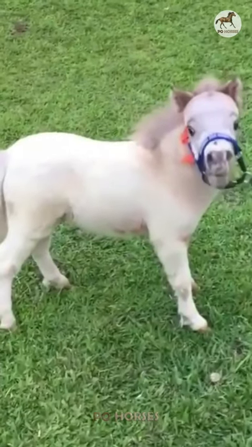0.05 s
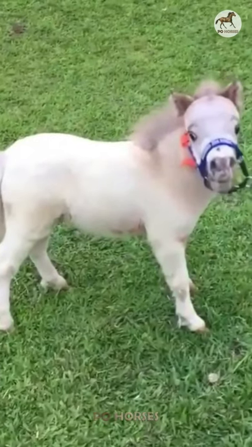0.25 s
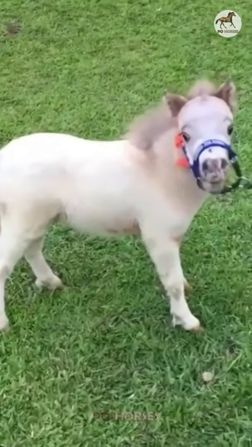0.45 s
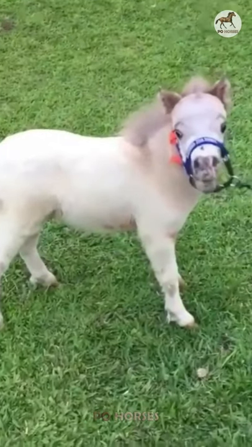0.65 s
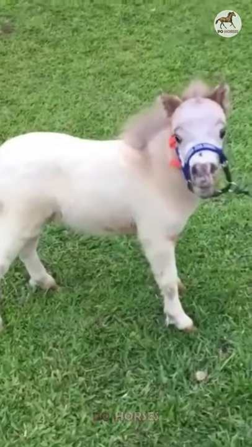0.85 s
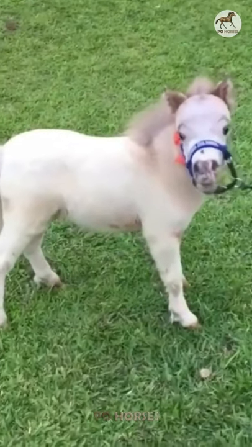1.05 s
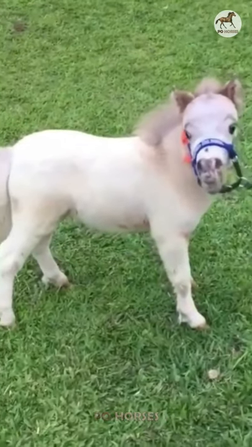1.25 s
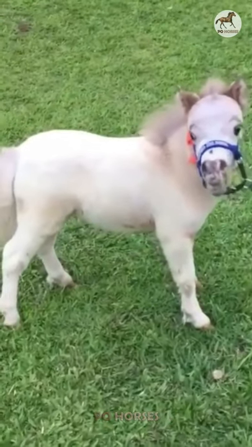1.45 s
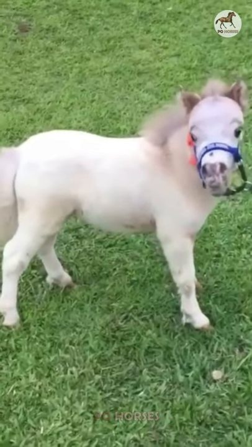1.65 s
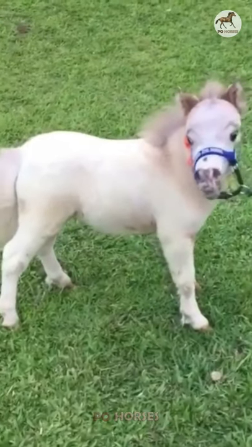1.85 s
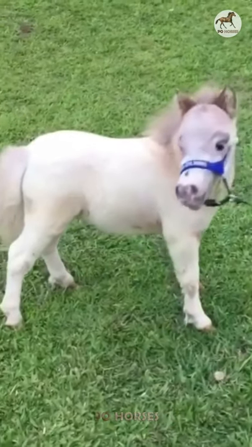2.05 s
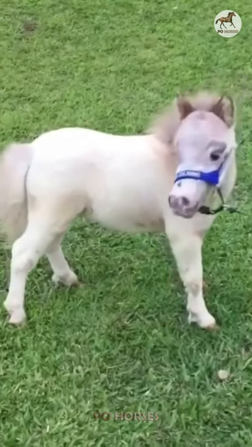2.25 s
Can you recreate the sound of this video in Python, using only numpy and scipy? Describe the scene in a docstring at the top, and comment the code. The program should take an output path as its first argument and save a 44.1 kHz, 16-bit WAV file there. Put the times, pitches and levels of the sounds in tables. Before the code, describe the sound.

A young miniature horse whinnies close to the microphone on an open lawn. After a soft breath in, a shrill squeak turns into a raspy, wavering call that ends in a short grunt, over a faint low rumble.

```python
"""A young miniature horse whinnies on an open lawn, close by, over a faint low rumble and hum.
It draws air through its nostrils, then a shrill, whistle-like voice starts with a clean squeak.
The voice turns raspy and wavers ever more deeply, while its ringing colour slowly shifts.
In the late dips a second, lower voice sounds, made of uneven beats of the vocal folds.
That voice ends the call as a slowing grunt while the rest of the breath goes out."""
import sys
import numpy as np
from scipy import signal
from scipy.fft import rfft, irfft, next_fast_len
from scipy.io import wavfile
from scipy.ndimage import uniform_filter1d

SR = 44100
rng = np.random.default_rng(int(sys.argv[2]) if len(sys.argv) > 2 else 0)


def materialize(psi):
    """Save the field psi as 16-bit PCM at rate SR to the path in sys.argv[1].

    A 1-D psi becomes a single channel; in a 2-D psi each row is a channel.
    """
    bounded = np.clip(np.atleast_2d(psi).T, -1, 1)
    quanta = np.round(bounded * 32767).astype(np.int16)
    wavfile.write(sys.argv[1], SR, quanta)


N = 101429
TIME = np.arange(N) / SR
CUTOFF_HZ = 15650
JITTER_HZ, SHIMMER_HZ, SHIMMER_DB = 300, 60, 3.2   # speed of pitch shake; speed and depth of level shake


def from_db(db):
    """Decibels to gain."""
    return 10 ** (np.asarray(db) / 20)


def unit_power(x):
    """Scale to an RMS of 1."""
    return x / np.sqrt(np.mean(x ** 2) + 1e-20)


def envelope(rows, column=1):
    """One column of a breakpoint table at every sample."""
    rows = np.array(rows)
    return np.interp(TIME, np.sort(rows[:, 0]), rows[:, column])


def eq_gain(curve, hz):
    """Gain of an EQ curve at given frequencies."""
    points_hz, db = np.transpose(curve)
    return from_db(np.interp(np.log(np.maximum(hz, 1)), np.log(np.sort(points_hz)), db))


def drift(hz):
    """Smooth random modulation at unit power; hz sets its speed."""
    pole = np.exp(-2 * np.pi * hz / SR)
    return unit_power(signal.lfilter([1], [1, -2 * pole, pole * pole], rng.standard_normal(2 * N))[N:])


def coloured(x, curve, resonances=()):
    """Shape a sound by a broad EQ curve and narrow bells, at unit power."""
    size = next_fast_len(N + SR // 10, True)
    hz = np.arange(size // 2 + 1) * SR / size
    bells_db = sum(db * np.exp(-.5 * np.minimum(np.abs(hz - centre) / width, 10) ** 2)
                   for centre, width, db in resonances)
    broad = eq_gain(curve, hz) if curve else 1
    return unit_power(irfft(rfft(x, size) * broad * from_db(bells_db), size)[:N])


def levelled(x, window_s=0.029):
    """Even out slow changes of level."""
    return x / np.sqrt(np.abs(uniform_filter1d(x ** 2, int(window_s * SR))) + 1e-6)


def gate(start_s, end_s, attack_s, release_s):
    """Linear attack, hold and release."""
    return np.clip((TIME - start_s) / attack_s, 0, 1) * np.clip((end_s - TIME) / release_s, 0, 1)


# Bass-heavy colour of the outdoor bed: freq_hz, gain_db
RUMBLE_EQ = [(25, -37.5), (65, 0), (110, 1), (200, -16), (550, -19.5), (2500, -38.5), (15000, -93)]


def background(hum_hz=113.5, hum_db=-45, rumble_db=-43.5):
    """Far outdoor rumble with a wavering hum."""
    phase = 2 * np.pi * np.cumsum(hum_hz * (1 + 0.0317 * drift(3.1))) / SR
    hum = from_db(hum_db + 2.5 * np.clip(drift(4), -2, 2)) * np.sin(phase)
    return hum + from_db(rumble_db) * coloured(rng.standard_normal(N), RUMBLE_EQ)


# Air through the nostrils, in and then out: time_s, level_db
BREATH = [(0, -67), (.09, -46.5), (.13, -36), (.165, -34.5), (.188, -53), (1.95, -113), (1.97, -35.5),
          (2.07, -31.5), (2.11, -45.5), (2.14, -58.5)]
# Colour of that breath: freq_hz, gain_db
BREATH_EQ = [(150, 2.5), (380, 2), (860, -12.5), (1700, -14.5), (4400, -6.5), (12000, -24.5), (13500, -51)]


def nostrils():
    """The horse draws air before the call and lets the rest out at its end."""
    return from_db(envelope(BREATH)) * call_colour(rng.standard_normal(N), BREATH_EQ)


def morph(from_s=1, to_s=1.63):
    """Timbre of the call, from 0 (early) to 1 (late)."""
    return np.clip((TIME - from_s) / (to_s - from_s), 0, 1)


# Narrow peaks and notches that colour the call, with ringing treble:
# centre_hz, width_hz, early_gain_db, late_gain_db
PEAKS_AND_NOTCHES = [(1150, 95, 12, 8.5), (2940, 190, 0, 5), (3377, 53, 5.5, 6), (3660, 77, -9, -14),
                     (4520, 57, 4.5, 10), (6210, 50, 3, 11.5), (7286, 60, 6.5, 0), (7580, 142, -12, -1.5),
                     (8600, 84, 4, 6.5), (8990, 54, 8.5, 5), (9190, 130, -5, -18.5), (9770, 100, 6, 4),
                     (10240, 98, -12, -0.5), (12920, 96.3, 16, 5.5)]


def call_colour(x, curve):
    """Apply a broad EQ and crossfade from the early peaks and notches to the late ones."""
    hz, width, early_db, late_db = np.transpose(PEAKS_AND_NOTCHES)
    early = coloured(x, curve, zip(hz, width, early_db))
    late = coloured(x, curve, zip(hz, width, late_db))
    return (1 - morph()) * early + morph() * late


# The opening squeak (clarity is tone over rasp): time_s, pitch_hz, level_db, clarity_db, fundamental_db
SQUEAK = [(.23, 1463, -15.5, 9, -41), (.246, 1503, -12, 33, -44.5), (.266, 1553, -18, 6, -39),
          (.276, 1623, -26.5, 1, -45), (.305, 1654, -23.5, -1.5, -39)]
# Wavers of the high voice: start_s, rise_s, trough_hz, crest_hz, level_db, clarity_db, fundamental_db
WAVERS = [(.333, 0.027, 1649, 1793, -21.5, 5, -34.5), (.417, 0.029, 1660, 1811, -20, 5.5, -32),
          (.518, 0.031, 1719, 1840, -16.5, -0.5, -29.5), (.620, 0.047, 1706, 1870, -18, -5.5, -30),
          (0.736, 0.023, 1705, 1875, -16.5, -2.5, -32), (.848, 0.038, 1687, 1881, -14, 0.5, -30.5),
          (.962, 0.063, 1617, 1799, -19.5, 1.5, -30.5), (1.085, 0.048, 1368, 1773, -19, 0.5, -29.5),
          (1.195, 0.049, 1289, 1776, -18.2, 2.5, -29.5), (1.308, .055, 1124, 1670, -16.5, -3, -29.5),
          (1.408, .063, 1204, 1717, -19, 0, -29.5), (1.524, 0.056, 1126, 1674, -16.7, 0, -31),
          (1.642, .064, 1127, 1579, -15.5, 3, -31), (1.751, .067, 1150, 1625, -17, 2.5, -33),
          (1.869, .049, 1085, 1518, -16.5, 1.5, -32)]
# Offsets through one early waver, in even steps from trough to trough with the crest in row four:
# level_db, clarity_db, fundamental_db, treble_db
EARLY_WAVER = [(-2, 5.5, -4, 4), (-6.5, -5, -3, -1.5), (-8, 0.5, -10.5, -0.5), (-5.5, -2, -7, -8.5),
               (-5, 6, -5, -1), (-5.5, 2, 3, 0)]
# The same through one late waver: level_db, clarity_db, fundamental_db, treble_db
LATE_WAVER = [(-0.96, -8.5, -6.7, -3.7), (-2.5, -6.5, -6.5, 3), (-0.94, -3.5, -4, 2),
              (-1.16, 2.5, -0.1, 7.5), (-0.87, 1, 2, 1.5), (-1.4, -0.5, -4.5, 5.5)]
# The closing downward slide: time_s, pitch_hz, level_db, clarity_db, fundamental_db
SLIDE = [(1.953, 1260, -19, -8, -27), (1.966, 1000, -33, -5, -24), (1.995, 500, -50, 2, -30)]


def whinny_contour(duck_s=0.014):
    """Pitch, level, clarity, fundamental and treble of the high voice through squeak, wavers and slide."""
    start, rise, trough_hz, crest_hz, *crest_levels = np.transpose(WAVERS)
    turns = np.append(np.column_stack([start, start + rise]), SLIDE[0][0])
    cycle = np.interp(TIME, turns, np.arange(len(turns)) / 2)   # whole at troughs, half at crests
    waver = np.minimum(cycle.astype(int), len(start) - 1)
    late = np.interp(TIME, [.88, 1.1], [0, 1])
    foot_hz = np.append(trough_hz, SLIDE[0][1])[np.round(cycle).astype(int)]
    fall = np.abs(2 * (cycle - waver) - 1) ** (1.2 + 1.1 * late)   # pointed wavers become round arches
    pitch = crest_hz[waver] + (foot_hz - crest_hz[waver]) * fall
    steps = np.arange(len(EARLY_WAVER)) / len(EARLY_WAVER)
    *offsets, treble = [
        (1 - late) * np.interp(cycle, steps, first, period=1)
        + late * np.interp(cycle, steps, last, period=1)
        for first, last in zip(np.transpose(EARLY_WAVER), np.transpose(LATE_WAVER))]
    level, clarity, fundamental = [np.interp(TIME, start + rise, db) + offset
                                   for db, offset in zip(crest_levels, offsets)]
    # The voice fades into each dip and returns abruptly.
    duck_db = sum(db * np.exp(-np.abs((TIME - s) / duck_s) ** np.where(TIME < s, 2, 10))
                  for s, *_, db in DIPS)
    opening = np.interp(TIME, [SQUEAK[-1][0], start[0]], [1, 0])
    controls = []
    for column, wavering in enumerate((pitch, level - duck_db, clarity, fundamental), 1):
        call = opening * envelope(SQUEAK, column) + (1 - opening) * wavering
        controls.append(np.where(TIME > SLIDE[0][0], envelope(SLIDE, column), call))
    controls.append(treble * (1 - opening))
    return [uniform_filter1d(control, size=220) for control in controls]


# Brief accents of the high voice: centre_s, half_length_s, boost_db, clarity_change_db
SURGES = [(0.845, .012, 0, -4), (1.058, 0.0096, 5, -1), (1.499, 0.0027, 5.5, -12.5),
          (1.692, 0.0093, 2, 8.5)]


def high_voice(hoarse_below_hz=1600, treble_hz=6900):
    """A shrill oscillator that shifts between clear tone and rasp and goes hoarse as it sinks."""
    pitch, level_db, clarity_db, fundamental_db, treble_db = whinny_contour()
    for centre_s, half_s, boost_db, change_db in SURGES:
        swell = np.exp(-((TIME - centre_s) / half_s) ** 2)
        level_db += boost_db * swell
        clarity_db += change_db * swell
    rough = 1 / np.sqrt(1 + from_db(clarity_db) ** 2)
    hoarse = rough ** 2 * np.clip(2 * (1 - pitch / hoarse_below_hz), 0, .5)
    jitter = .002 + .014 * rough ** 2 + .1 * hoarse
    phase = 2 * np.pi * np.cumsum(pitch * (1 + jitter * drift(JITTER_HZ))) / SR
    tone = np.sqrt(1 - rough ** 2) * overtones(pitch, phase, rough)
    upper = tone + rough * rasp(phase, rough) + side_tones(phase)
    treble = signal.sosfiltfilt(signal.butter(2, treble_hz, "high", fs=SR, output="sos"), upper)
    upper += (from_db(treble_db) - 1) * treble
    flutter = (1 - hoarse) + hoarse * drift(JITTER_HZ)
    shimmer_db = SHIMMER_DB * rough ** 2 * drift(SHIMMER_HZ)
    fundamental = from_db(fundamental_db + shimmer_db) * flutter * np.sqrt(2) * np.sin(phase)
    return (from_db(level_db) * upper + fundamental) * gate(0.2227, 2.01, 0.0041, 0.014)


# Piercing colour of the overtones: freq_hz, gain_db
OVERTONE_EQ = [(2600, -8), (3400, 0.5), (4550, 6.5), (5400, 11), (6200, 9), (7000, -12), (8900, -1.5),
               (10500, -57)]


def overtones(pitch, phase, rough):
    """Harmonics 2 to 6; roughness shakes them and brings in weak half-order tones between them."""
    tone = 0
    for order in np.arange(4, 13) / 2:
        if order % 1 == 0:
            strength, slip_rad = 1, (.85 - .5 * morph()) * rough
        else:
            strength, slip_rad = from_db(-10 + 2 * SHIMMER_DB * drift(32)) * rough, 0.77
        shimmer = from_db(SHIMMER_DB * rough * drift(SHIMMER_HZ))
        partial = np.sin(order * phase + slip_rad * drift(JITTER_HZ))
        tone += strength * shimmer * eq_gain(OVERTONE_EQ, order * pitch) * partial
    return levelled(call_colour(tone, None), window_s=0.091)


# Thin, high inharmonic tones that sound along with the squeak: pitch_ratio, gain_db
SIDE_TONES = [(4.7, -10), (5.68, -9), (6.65, -10)]


def side_tones(phase, slip_rad=.35):
    """Thin, high tones that follow the squeak's pitch and fade as it goes on."""
    fade = np.interp(TIME, [SQUEAK[0][0], SQUEAK[-2][0]], [1, 0])
    return fade * sum(from_db(db) * np.sin(ratio * phase + slip_rad * drift(JITTER_HZ))
                      for ratio, db in SIDE_TONES)


# Bright hiss of the rasp, above about 2.5 kHz: freq_hz, gain_db
RASP_HISS_EQ = [(2000, -39), (2550, -14.5), (3200, -8.5), (4400, 1.5), (6200, 2.5), (8700, -1.5),
                (10500, -7.5), (11900, -3), (12250, -27.5), (13100, -18), (13400, -37.5), (15500, -50.5)]
# Darker body of the rasp, around 1-2 kHz: freq_hz, gain_db
RASP_BODY_EQ = [(200, -25), (1150, -3), (2100, 0), (2700, -13), (3500, -26)]


def rasp(phase, rough, pulsing=0.16):
    """Air pulsing at the voice's pitch: a patchy hiss, with a lower body that grows with roughness."""
    air = rng.standard_normal(N) * (1 + pulsing * np.cos(phase))
    hiss = levelled(call_colour(patchy(air), RASP_HISS_EQ))
    body = from_db(-15) * rough ** 2 * call_colour(air, RASP_BODY_EQ)
    return hiss + body


def patchy(x, depth_db=3.4, speed_hz=32, spacing_hz=430):
    """Each narrow band of the spectrum swells and fades on its own."""
    size = next_fast_len(N, True)
    spectrum = rfft(x, size)
    position = np.arange(size // 2 + 1) * SR / size / spacing_hz
    bands = (irfft(spectrum * np.clip(1 - np.abs(position - k), 0, 1), size)[:N]
             for k in range(int(CUTOFF_HZ / spacing_hz) + 1))
    return sum(band * from_db(depth_db * np.clip(drift(speed_hz), -2, 2)) for band in bands)


def fold_pulses(pitch, air_db, jitter=.035):
    """Uneven beats of the vocal folds, each with a puff of air."""
    cycles = np.cumsum(pitch * (1 + jitter * drift(JITTER_HZ))) / SR
    beats = np.diff(np.floor(cycles), prepend=0) / np.sqrt(pitch)
    beats *= from_db(SHIMMER_DB * drift(JITTER_HZ))
    puffs = rng.standard_normal(N) * np.exp(-4 * (cycles % 1))
    return unit_power(beats) + from_db(air_db) * unit_power(puffs)


# Low notes in the dips: centre_s, half_length_s, pitch_hz, level_db, high_voice_duck_db
DIPS = [(1.308, 0.026, 540.5, -28, 9), (1.409, 0.024, 569.6, -25, -1), (1.524, 0.024, 532.2, -26, 7),
        (1.64, .024, 400, -24, 11), (1.746, 0.025, 563, -25, 6.5), (1.869, 0.027, 380.6, -22, 10.5)]
# Mid-heavy colour of those notes: freq_hz, gain_db
LOW_VOICE_EQ = [(200, -39), (370, 0.5), (560, -2.5), (800, -11.5), (1130, 3), (1700, -2), (4500, -32.5)]


def low_voice(bend=0.27, fall=0.2):
    """The low voice swells in each late dip of the high one; its pitch falls, then curls up a little."""
    pitch, level = np.ones(N) * DIPS[0][2], np.zeros(N)
    for centre_s, half_s, hz, db, _ in DIPS:
        position = (TIME - centre_s) / half_s
        inside = np.abs(position) < 1
        pitch[inside] = hz * (1 + bend * position[inside] ** 2 - fall * position[inside])
        level[inside] = from_db(db) * np.cos(np.pi / 2 * position[inside])
    return level * levelled(call_colour(fold_pulses(pitch, air_db=-7), LOW_VOICE_EQ))


# The closing grunt: time_s, pulse_rate_hz, level_db
GRUNT = [(1.945, 417, -33), (1.962, 369, -27), (1.98, 281, -31), (1.998, 144, -28.5), (2.058, 150, -29.5),
         (2.085, 103, -42), (2.118, 112, -47)]
# Dark colour of the grunt: freq_hz, gain_db
GRUNT_EQ = [(50, -42), (130, -5.5), (290, -2.5), (450, -12.5), (570, -0.5), (800, -15.5), (1100, -5.5),
            (1450, -14.5), (1870, -3.5), (2500, -27), (9000, -47)]


def grunt(unevenness=0.057):
    """The low voice slows into a soft, uneven flutter and dies."""
    rate_hz = envelope(GRUNT) * np.exp(unevenness * drift(SHIMMER_HZ))
    voice = levelled(call_colour(fold_pulses(rate_hz, air_db=-4), GRUNT_EQ))
    return voice * from_db(envelope(GRUNT, 2)) * gate(1.94, 2.13, 0.0059, 0.0044)


def scene():
    """The horse in the open air, in mono."""
    return (high_voice() + low_voice() + grunt() + nostrils() + background())[None]


def record(dry):
    """A steep low-pass takes off the very top."""
    return signal.sosfilt(signal.cheby2(16, 70, CUTOFF_HZ, fs=SR, output="sos"), dry)


dry = scene()
out = record(dry)
materialize(out)
```